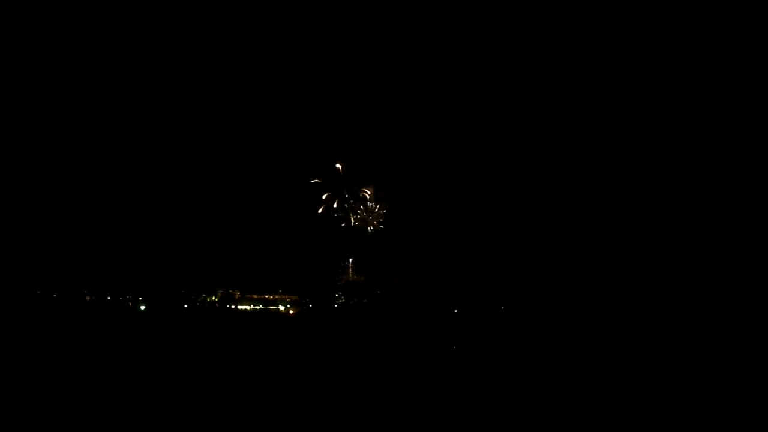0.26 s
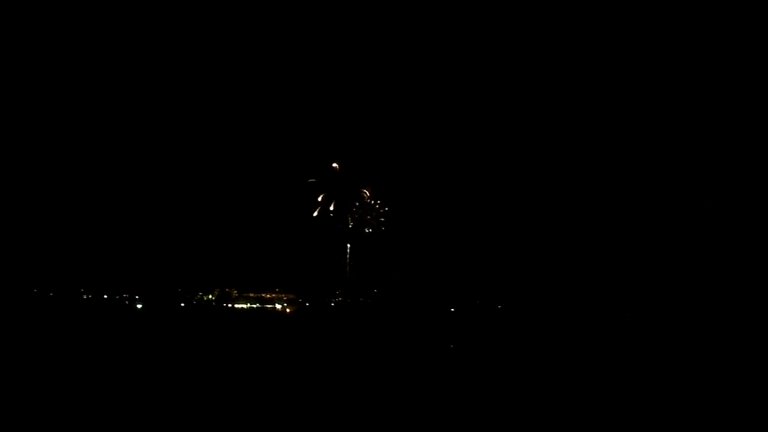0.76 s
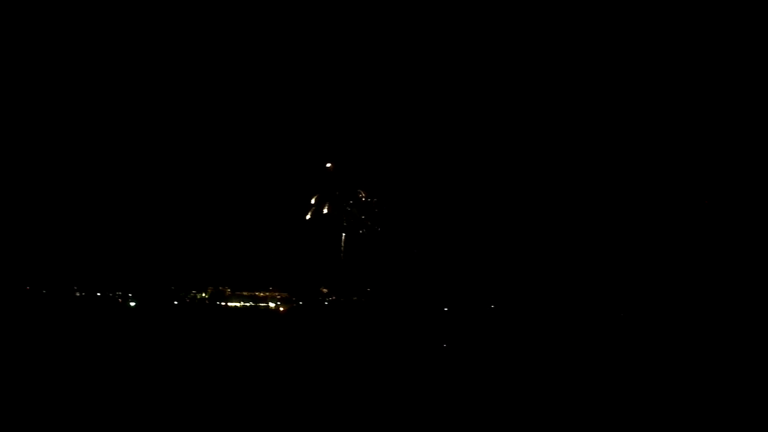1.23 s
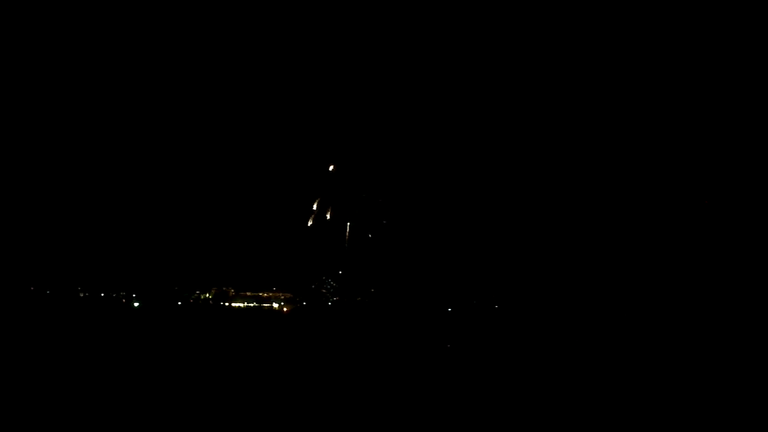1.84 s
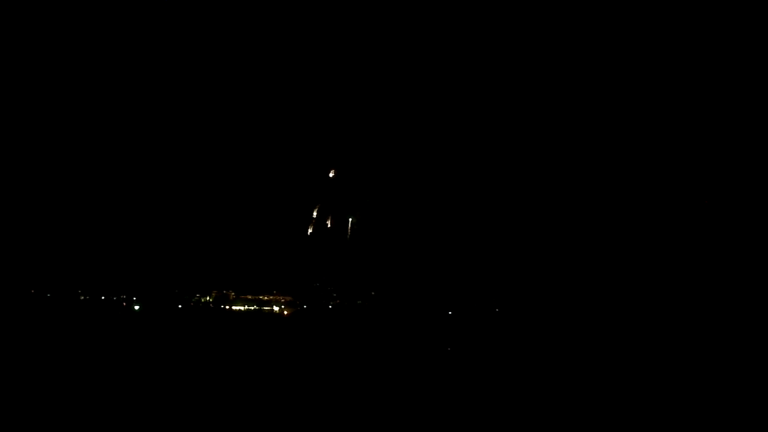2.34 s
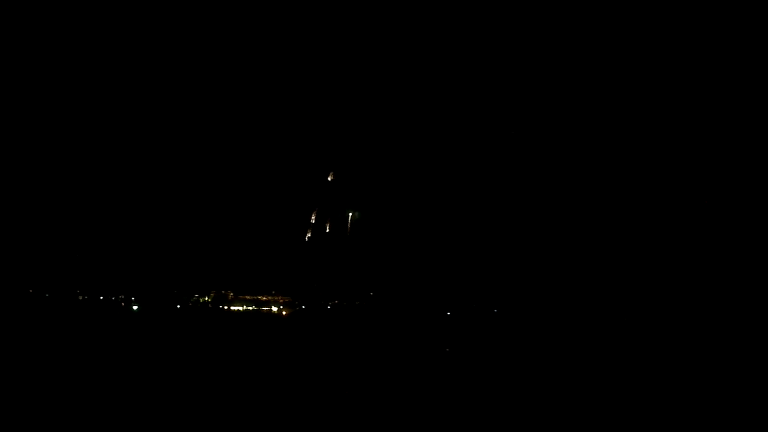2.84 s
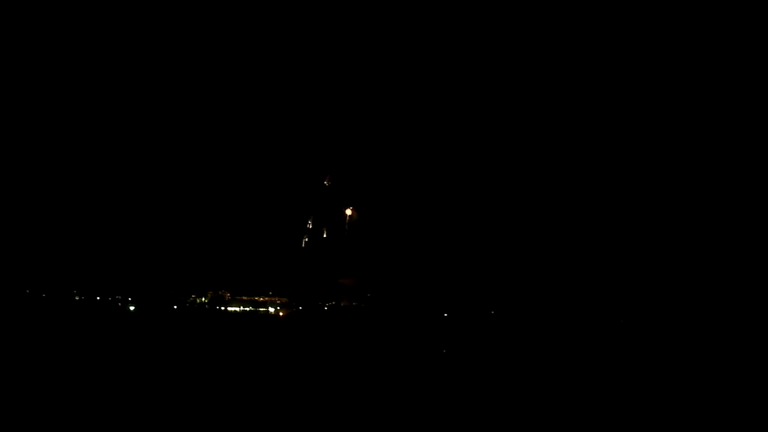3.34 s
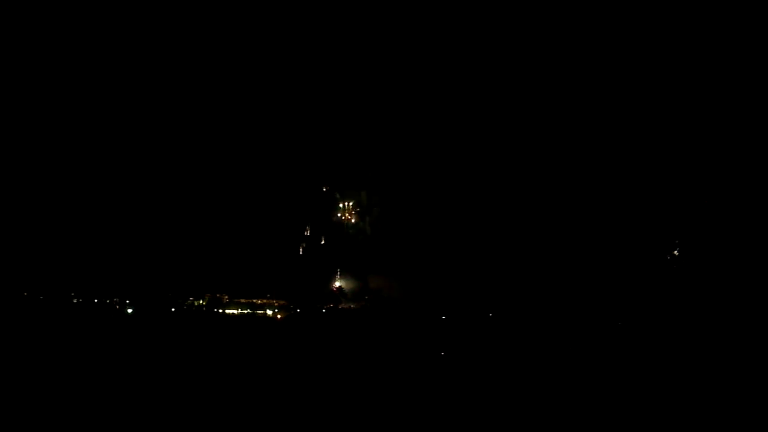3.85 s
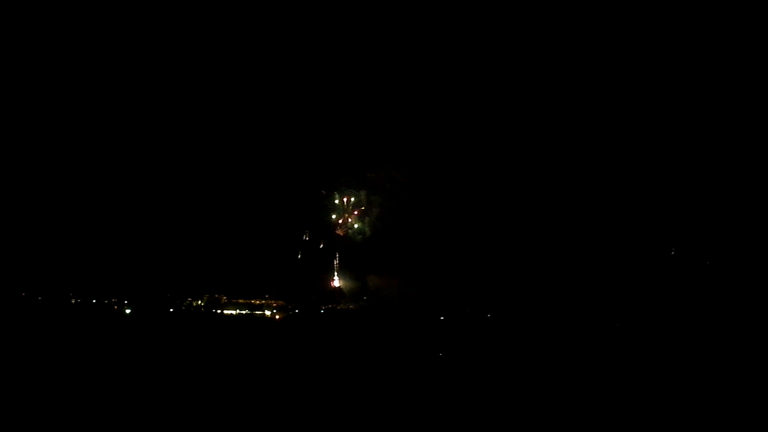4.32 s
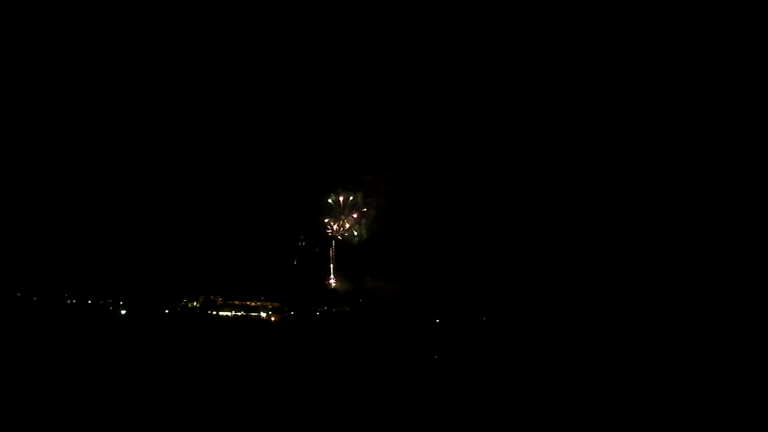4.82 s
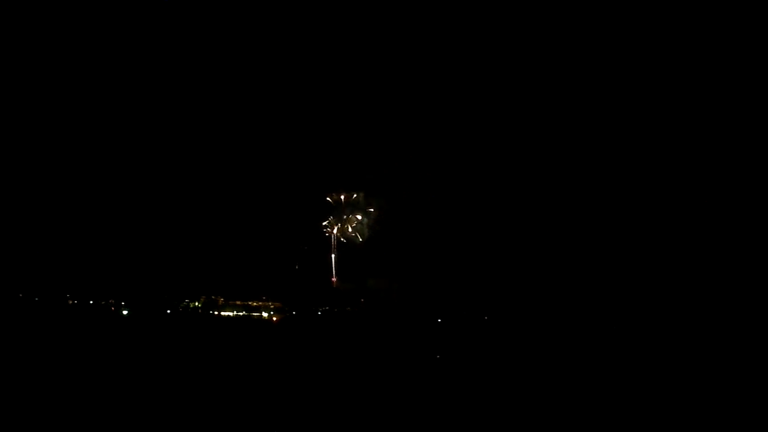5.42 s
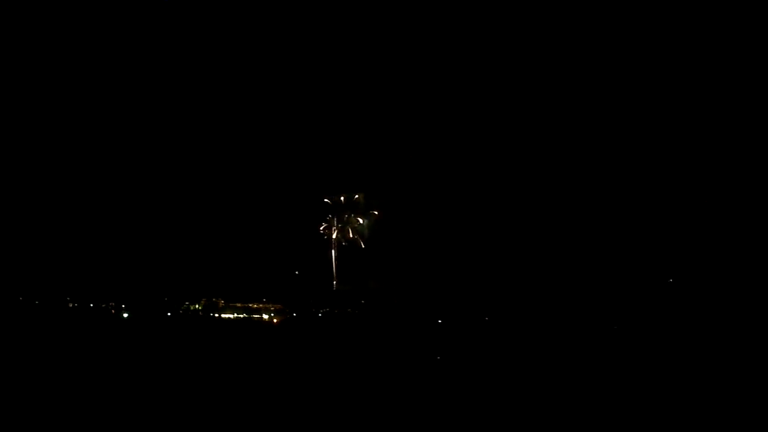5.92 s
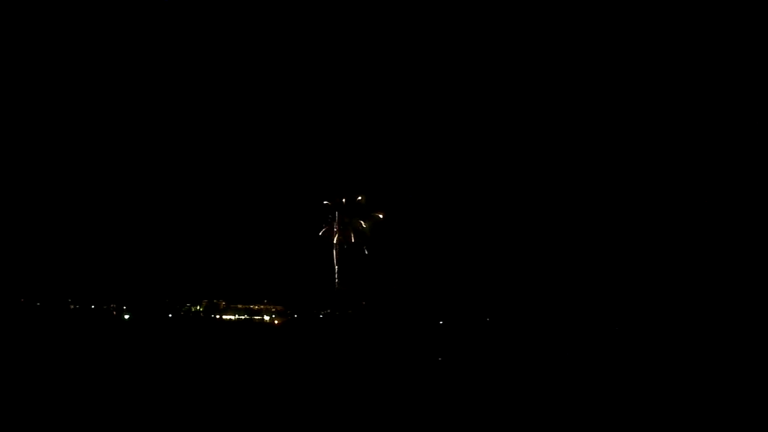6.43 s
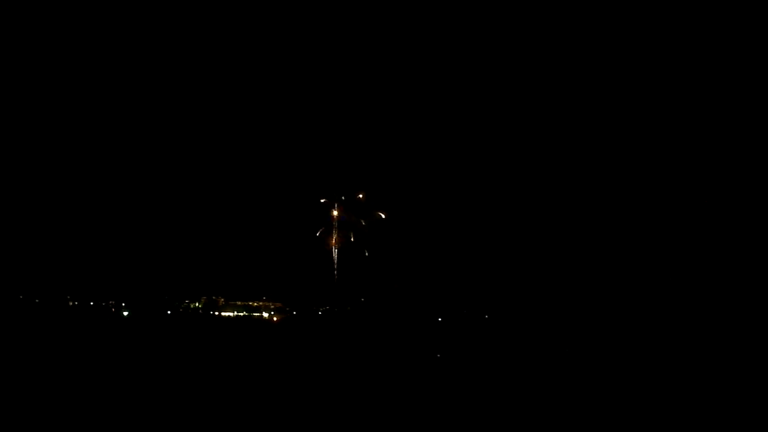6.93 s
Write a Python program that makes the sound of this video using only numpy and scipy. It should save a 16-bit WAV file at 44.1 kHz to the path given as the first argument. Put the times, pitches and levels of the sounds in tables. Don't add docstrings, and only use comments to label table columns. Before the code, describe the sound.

Outdoors at night, far across a town, fireworks go off in a nearly continuous run of dull, low-mid thuds, each blurred by echoes from houses. The bursts grow closer and tighter, thin out, then two sharp bangs hit, the second loudest. Crackling stars flare briefly and a few weak pops trail off. A tape camcorder microphone adds thin whine, hiss and small plastic ticks.

```python
import sys
import numpy as np
from scipy import signal
from scipy.fft import rfft, irfft, next_fast_len
from scipy.io import wavfile
from scipy.ndimage import uniform_filter1d

SR = 44100
rng = np.random.default_rng(int(sys.argv[2]) if len(sys.argv) > 2 else 0)


def gain_from_db(level_db):
    decades = np.asarray(level_db, float) / 20
    return 10 ** decades


def wrap_up_sound(samples):
    columns = np.atleast_2d(samples).T
    tamed = np.clip(columns, -1, 1)
    steps = np.round(tamed * 32767).astype(np.int16)
    wavfile.write(sys.argv[1], SR, steps)


N = 316197

# start in seconds, peak level in dB, bass of the charge in dB, echo level in dB.
FAR_SALVO = [(0.0014, -17, 3, -5.5), (0.0447, -22, 24, -10), (0.1785, -20, 5, -22), (0.209, -11.5, 1.5, -6),
             (0.222, -20, -1, -0.5), (0.2685, -19, -2, -3), (0.388, -12.5, 3.5, -5.5),
             (0.4373, -23, -10, -7.5), (0.6406, -16.5, 8, -4), (0.658, -19.5, 3.5, -0.5),
             (0.7227, -17, -5, -12), (0.748, -15, 2, -5), (0.8735, -12.5, 6.5, -3.5),
             (0.9323, -17.5, 0, -9), (1.031, -18, 2.5, -5.5), (1.216, -14, 2.5, -7), (1.2831, -11.5, 2, -9),
             (1.3735, -17, 4.5, -3.5), (1.4685, -10, 2, -4), (1.4997, -22, 2, -8), (1.56, -11, 0, -4),
             (1.6251, -19.5, -4, -4.5), (1.6823, -18, 6, 0.5), (1.7263, -25, -9, 2), (1.7586, -32, -9, 2),
             (1.777, -16.5, 7, -19), (1.856, -11, 2.5, -6.5), (1.896, -23.5, 14, -2.5)]
MID_SALVO = [(2.0668, -20, 5, -6.5), (2.1275, -12, 2.5, -6.5), (2.1781, -18.5, -1, -4.5),
             (2.2698, -13.5, -3, -5.5), (2.294, -12.5, 6, -9), (2.3568, -20.5, -19, 3),
             (2.3646, -10.5, 3, -14), (2.39, -16.5, 4, -8), (2.5277, -30, 14, -9), (2.6068, -12, -4, -7.5),
             (2.7399, -20, 7.5, -2.5), (2.7921, -14, 0, -7), (2.8556, -12, -4.5, -5.5),
             (2.8903, -12.5, -0.5, -7.5), (2.9698, -14.5, -3, -7.5), (3.0155, -22.5, 3, 4),
             (3.0973, -6, 3.5, -8.5), (3.2138, -17, 4.5, -5), (3.3252, -14.5, -5, -3.5),
             (3.4731, -15, -3, -3), (3.5038, -19, -3, -12), (3.5163, -21.5, 4.5, -6),
             (3.6676, -15, 6, -5.5), (3.7362, -17.5, 2, -14), (3.812, -15, 2, -2), (3.8466, -20, -8, -2),
             (3.8997, -21, -19, -2.5), (3.9555, -19, -2, -5)]
NEAR_SALVO = [(4.0697, -11.5, -5, -9), (4.0862, -20.5, -9, -7), (4.155, -12, -15, -5.5),
              (4.1628, -9.5, -5, -9), (4.1753, -16, -1, -2), (4.2178, -14, -18, -2), (4.2418, -14, 1.5, -3),
              (4.2753, -7, 9, -4.5), (4.3432, -16, -26, -0.5), (4.3936, -15.5, 3, 3), (4.4572, -21, 6, 4),
              (4.5772, -19, -13, -6), (4.7068, -17, -2.5, -9), (4.8084, -14, 2, -9),
              (4.8666, -14, -0.5, -1.5), (4.9012, -17.5, 8, -13), (5.1143, -14, 2.5, 0.5),
              (5.1968, -10, 11.5, -6.5), (5.2637, -18.5, 3.5, -3.5), (5.5, -28, 1, -8),
              (5.68, -30.5, 0.5, -1)]
# start in seconds, peak level in dB, bass in dB, echo level in dB.
BANGS = [
    (5.8177, -5.5, -33, -7),
    (5.831, -25.5, -1, -4),
    (5.8542, -9.5, 8, -13),
    (6.0651, 0, -5.5, -5.5),
]
# start in seconds, peak level in dB, bass in dB, echo level in dB.
STRAGGLERS = [
    (6.3391, -18.5, -12, -3),
    (6.3594, -16, -19, -7.5),
    (6.4183, -21.5, -23, -10),
    (6.5261, -29, -5, 2),
    (6.65, -27.5, -13, 8),
    (6.7258, -14.5, -6.5, -8.5),
    (6.7587, -26.5, -13, 2),
    (6.9477, -26, -8, 0.5),
    (7.0276, -50, -28, 4),
]
# treble left by the air in dB, echo decay (t60) in seconds,
# dense wash in dB, share of the hollows (0 up), delays of ground and streets as a share of the usual,
# ground echo as a signed gain.
SITES = [
    (-15, 0.4, 0, 1.32, 1, -0.49),
    (-13.5, 0.38, 1.5, 0.92, 0.985, -0.49),
    (-11.5, 0.4, 0.5, 0.76, 1.007, -0.49),
    (-8, 0.37, 6.5, 0.51, 0.46, 0.44),
    (-14.5, 0.52, 4.5, 0.6, .9, -0.7),
]
# frequency in Hz, level in dB.
PATH_COLOUR = [(30, -34), (60, -34), (100, -9.5), (150, -0.5), (300, 1), (480, -1.5), (570, -6),
               (750, -4.5), (1000, -12), (1800, -22.5), (2600, -29), (3800, -32.5), (5500, -48),
               (7000, -71)]
# frequency in Hz, width in Hz, boost in dB.
HOLLOWS = [(157, 22, 7), (227, 24, 9), (375, 30, 7), (411, 30, 7), (496, 26, 5)]
# start in seconds, level in dB, decay (t60) in seconds.
STARS = [
    (6.066, -67, 0.3),
    (6.333, -48.5, .15),
    (6.35, -52.5, 1),
    (6.44, -66, .5),
    (6.643, -36, 0.15),
    (6.7, -44.5, 0.49),
    (6.85, -60.5, 0.82),
    (7.03, -66, 0.98),
]
# frequency in Hz, level in dB.
CRACKLE_COLOUR = [(300, 3), (700, 9), (1800, -5), (2600, -3), (3800, -12), (5500, -20), (7000, -26),
                  (10000, -38)]
# time in seconds, pitch in Hz, level in dB.
ROCKET = [
    (4.56, 1560, -70),
    (4.6, 1620, -51),
    (4.65, 1680, -52),
    (4.7, 1750, -50),
    (4.76, 1790, -48),
    (4.8, 1780, -48),
    (4.82, 1760, -80),
]
# frequency in Hz, level in dB per Hz.
ROLL_COLOUR = [(30, -100), (70, -78), (120, -73), (170, -62.5), (250, -96)]
# frequency in Hz, level in dB per Hz.
TOWN_COLOUR = [(60, -105), (150, -66), (200, -63), (400, -67.5), (700, -72.5), (1200, -83), (2000, -85.5),
               (4000, -105)]
# frequency in Hz, level in dB per Hz.
HISS_COLOUR = [(1500, -84), (2500, -93.5), (3500, -90.5), (4600, -100.5), (5500, -101.7), (6200, -91.5),
               (6900, -82.5), (7500, -87), (8500, -100.6), (10000, -103.4), (12000, -106.8),
               (14500, -107.6), (15500, -109.4)]
# order as a whole number, level in dB.
WHINE_STRONG = [(28, -70), (39, -70), (50, -76), (55, -75), (63, -74), (67, -77), (69, -73), (83, -80),
                (100, -79), (104, -75), (107, -77), (112, -68), (114, -72), (115, -70), (116, -65),
                (117, -71), (119, -70), (120, -68), (121, -71), (124, -70), (126, -72), (174, -81)]
# frequency in Hz, level in dB.
WHINE_WEAK = [(2000, -92.5), (5500, -82), (6200, -143), (6900, -100), (8000, -78.5), (9500, -100),
              (12000, -101)]
# frequency in Hz, level in dB.
SCAN_TONES = [(15734.3, -72), (15747.2, -77)]
# from seconds, to seconds.
SCAN_GAP = (4.29, 4.35)
# start in seconds, peak level in dB.
TICKS = [(0.169, -51), (0.5561, -53), (0.5881, -68), (0.61, -55), (0.7387, -54), (0.7816, -53),
         (0.846, -49), (0.8679, -53), (1.1363, -54), (1.3289, -62), (1.7389, -58), (1.8128, -54),
         (1.8562, -55), (1.9794, -55), (2.3501, -47), (2.393, -54), (2.4249, -52), (2.5541, -51),
         (2.6509, -55), (2.8335, -48), (3.1448, -55), (3.351, -56), (4.1759, -59), (4.2068, -53),
         (4.2298, -53), (4.4448, -43), (4.9496, -55), (5.9713, -48), (6.5086, -56), (7.1526, -57)]
# start in seconds, peak level in dB.
RATTLE = [
    (4.4445, -41),
    (4.449, -39),
    (4.458, -43),
    (4.482, -50),
]
# start in seconds, change in dB, recovery in seconds.
DUCKS = [
    (4.275, -2.5, 0.44),
    (6.07, -5, 1.7),
    (6.65, -2, 1.3),
]
# frequency in Hz, level in dB.
LEFT_DB = [(100, -9.5), (300, -9), (450, -7), (700, -4.5), (1000, -1.5), (1400, 0)]
# frequency in Hz, turn in radians.
LEFT_TURN = [(100, 0.28), (350, -0.64), (700, -0.21), (1300, -0.056)]
# frequency in Hz, likeness from 0 to 1.
LEFT_SAME = [(100, .9), (300, .68), (450, .86), (600, .75), (1000, .94), (1400, 1)]

DRUM_HZ = 58.606


def read(points, hz):
    f, value = np.transpose(points)
    return np.interp(np.log(hz + 1), np.log(f + 1), value)


def add(mix, s, sound):
    part = mix[:, round(s * SR):][:, :sound.shape[1]]
    part += sound[:, :part.shape[1]]


def causal(db):
    c = irfft(np.log(gain_from_db(np.maximum(db, -100))))
    half = len(c) // 2
    c[1:half] *= 2
    c[half + 1:] = 0
    return irfft(np.exp(rfft(c)))[:half]


def swell(s, rise_s):
    since = np.maximum(np.arange(N) / SR - s, 0)
    return since, np.minimum(since / rise_s, 1)


def noise(points, patchy_db, swell_db):
    frames, hz = N // 256 + 5, np.fft.rfftfreq(1024, 1 / SR)
    a, b, c, d, patches = rng.standard_normal((frames, 513, 5)).T
    patches = uniform_filter1d(uniform_filter1d(patches, size=10, axis=0), size=12, axis=1)
    drift = uniform_filter1d(rng.standard_normal(frames), size=30)
    colour_db = read(points, hz)
    db = colour_db[:, None] + patchy_db * patches / patches.std() + swell_db * drift / drift.std()
    spectra = np.array([a + 1j * b, c + 1j * d]) * gain_from_db(db)
    x = signal.istft(spectra, nperseg=1024, noverlap=768)[1][:, :N]
    return x / x.std() * np.sqrt(np.sum(gain_from_db(2 * colour_db)) * SR / 1024)


def blast_wave(peak_db, bass_db, treble_db, hollow):
    hz = np.fft.rfftfreq(4096, 1 / SR)
    hollows_db = sum(db / (1 + (2 * (hz - f) / width) ** 2) for f, width, db in HOLLOWS)
    air = treble_db + 7 + 0.11 * (max(peak_db, -25) + 16)
    crack = air + 3.5 * min(peak_db + 3, 0)
    charge_db = read([(200, bass_db), (330, 0.012), (510, 0.012), (580, 0.54 * air),
                      (1000, air), (1900, 1.16 * air), (3300, crack)], hz)
    blast = causal(read(PATH_COLOUR, hz) + hollow * hollows_db + charge_db)
    return blast / abs(blast).max()


def houses(echo_db, t60, wash_db, reach, ground, wall_loss):
    t = np.arange(SR // 2) / SR
    shape = (2, len(t))
    walls = rng.standard_normal(shape) * (rng.random(shape) < 200 / SR)
    wash = 0.035 * gain_from_db(wash_db) * rng.standard_normal(shape)
    held = np.maximum(t - 0.03 * reach, 0)
    rise = np.clip(t / (0.008 * reach), 0, 1) ** 2
    fade = gain_from_db(min(echo_db, 2) - 60 * held / t60) * rise
    path = signal.fftconvolve((0.65 * walls + wash) * fade, wall_loss[None], axes=1)
    path[:, 0] += [1, 0.35]
    path[:, round(reach * rng.integers(90, 200))] += ground
    return path


def pops():
    out = np.zeros((2, N))
    hz = np.fft.rfftfreq(4096, 1 / SR)
    wall_loss = causal(read([(450, -3), (900, -4), (2000, -2.5), (6000, -4)], hz))
    for rows, site in zip((FAR_SALVO, MID_SALVO, NEAR_SALVO, BANGS, STRAGGLERS), SITES):
        treble_db, t60, wash_db, hollow, reach, ground = site
        for s, peak_db, bass_db, echo_db in rows:
            blast = blast_wave(peak_db, bass_db, treble_db, hollow)
            path = houses(echo_db, t60, wash_db, reach, ground, wall_loss)
            add(out, s, gain_from_db(peak_db) * signal.fftconvolve(path, blast[None], axes=1))
    return out


def crackling_stars():
    sizes = rng.standard_normal(N) * gain_from_db(2.2 * rng.exponential(1, N))
    snaps = sizes * (rng.random(N) < 5000 / SR)
    colour = causal(read(CRACKLE_COLOUR, np.fft.rfftfreq(1024, 1 / SR)))
    snaps = signal.oaconvolve(snaps, colour)[:N]
    rise_s, embers_db = 0.0096, -58.5
    level = gain_from_db(embers_db) * swell(STARS[0][0], rise_s)[1]
    for s, db, t60 in STARS:
        since, ramp = swell(s, rise_s)
        level = level + ramp * gain_from_db(db - 60 * since / t60)
    return gain_from_db(11.5) * level * snaps / snaps.std()


def rocket():
    t = np.arange(N) / SR
    s, hz, db = np.transpose(ROCKET)
    waver = 1 + 0.45 * uniform_filter1d(rng.standard_normal(N), size=600)
    turns = np.cumsum(np.interp(t, s, hz) * waver) / SR
    return gain_from_db(np.interp(t, s, db, -150, -150)) * np.sin(2 * np.pi * turns)


def roll():
    ends_s, fade_s, drop_db = 5.4, 0.3, -4
    level_db = -4.5 + drop_db * swell(ends_s, fade_s)[1]
    return noise(ROLL_COLOUR, patchy_db=2.5, swell_db=3) * gain_from_db(level_db)


def ticks():
    out, t = np.zeros((2, N)), np.arange(1800) / SR
    bright = signal.butter(2, 10500, "high", fs=SR, output="sos")
    for s, db in TICKS + RATTLE:
        burst = rng.standard_normal((2, len(t))) * gain_from_db(db - 2 - 60 * t / 0.05)
        add(out, s, signal.sosfilt(bright, burst))
    return out


def drum_whine():
    order = np.arange(30, 205)
    lines = np.zeros(order[-1] + 1, complex)
    lines[order] = gain_from_db(read(WHINE_WEAK, order * DRUM_HZ) + 3 * rng.standard_normal(len(order)))
    for k, db in WHINE_STRONG:
        lines[k] = gain_from_db(db + 2.5)
    phases = np.exp(2j * np.pi * rng.random(len(lines)))
    turn = irfft(np.sqrt(2) * 2048 * lines * phases, 4096)
    position = DRUM_HZ * np.arange(N) / SR % 1 * 4096
    return np.interp(position, np.arange(4097), np.append(turn, turn[0]))


def transport_hiss():
    angle = 2 * np.pi * DRUM_HZ * np.arange(N) / SR
    throb = 1 + 0.2 * np.cos(2 * angle) + 0.06 * np.cos(angle)
    return noise(HISS_COLOUR, patchy_db=0.7, swell_db=0.4) * throb


def scan_leak():
    t = np.arange(N) / SR
    tones = sum(np.sqrt(2) * gain_from_db(db) * np.sin(2 * np.pi * f * t) for f, db in SCAN_TONES)
    return tones * ((t < SCAN_GAP[0]) | (t > SCAN_GAP[1]))


def town():
    return noise(TOWN_COLOUR, patchy_db=1, swell_db=-2.1)


def scene():
    fireworks = pops() + crackling_stars() + rocket() + roll()
    camcorder = ticks() + drum_whine() + transport_hiss() + scan_leak()
    return (fireworks + camcorder + town())[::-1]


def auto_gain():
    db = 2
    for s, duck_db, back_s in DUCKS:
        since, ramp = swell(s, 0.0059)
        db = db + duck_db * ramp * np.exp(-since / back_s)
    return gain_from_db(db)


def low_pass(x):
    return signal.sosfilt(signal.butter(12, 15850, fs=SR, output="sos"), x)


def record(dry):
    size = next_fast_len(N + 64)
    hz = np.fft.rfftfreq(size, 1 / SR)
    band = gain_from_db(read([(20, -17), (50, -18), (90, -1), (15770, -4), (15900, -36)], hz))
    apart, right = rfft(dry * auto_gain(), size) * band
    right = rfft(0.75 * np.tanh(irfft(right, size) / 0.75))
    same = read(LEFT_SAME, hz)
    late_samples = 15
    turn = read(LEFT_TURN, hz) - 2 * np.pi * hz * late_samples / SR
    blend = same * right + np.sqrt(1 - same ** 2) * apart
    left = -gain_from_db(read(LEFT_DB, hz)) * np.exp(1j * turn) * blend
    mix = irfft(np.array([left, right]), size)[:, :N]
    return low_pass(mix)


dry = scene()
out = record(dry)
wrap_up_sound(out)
```